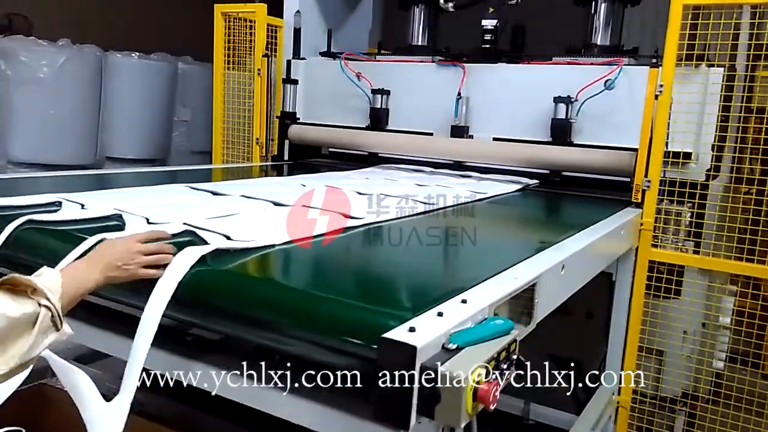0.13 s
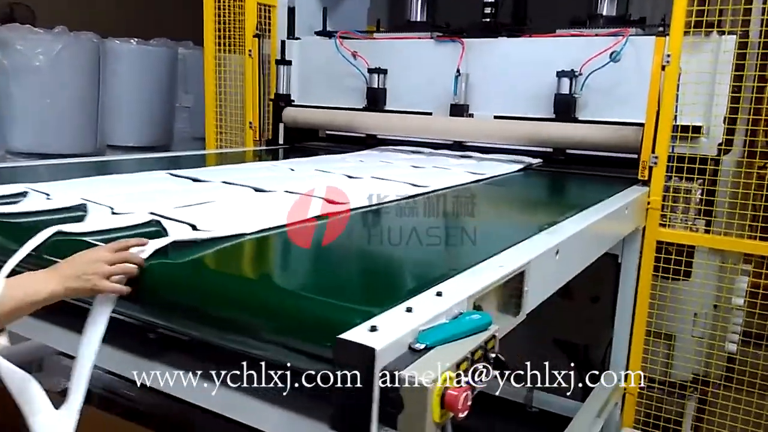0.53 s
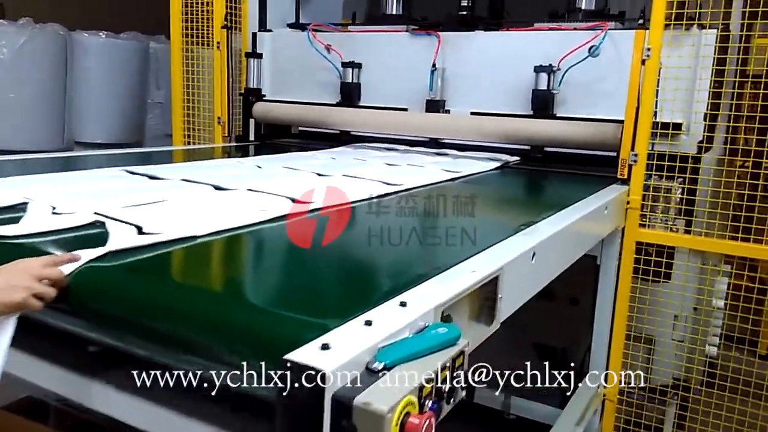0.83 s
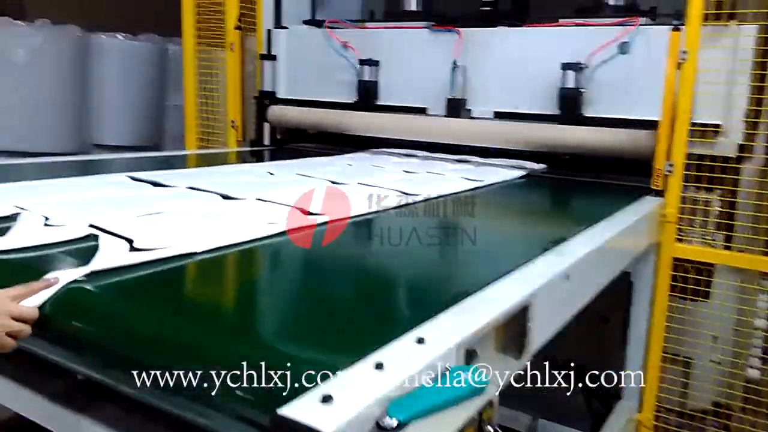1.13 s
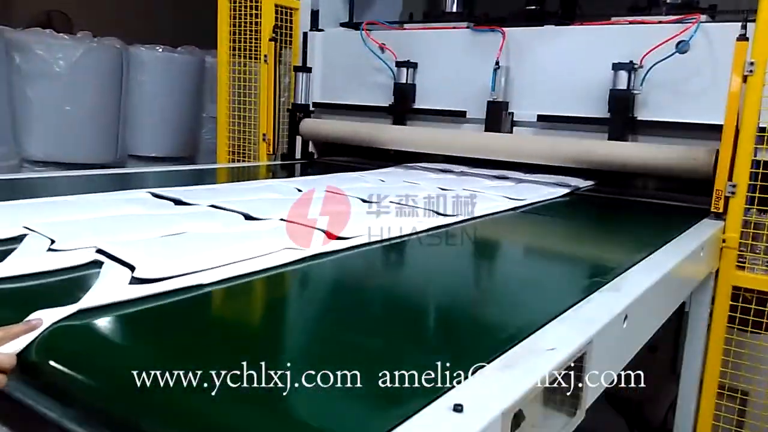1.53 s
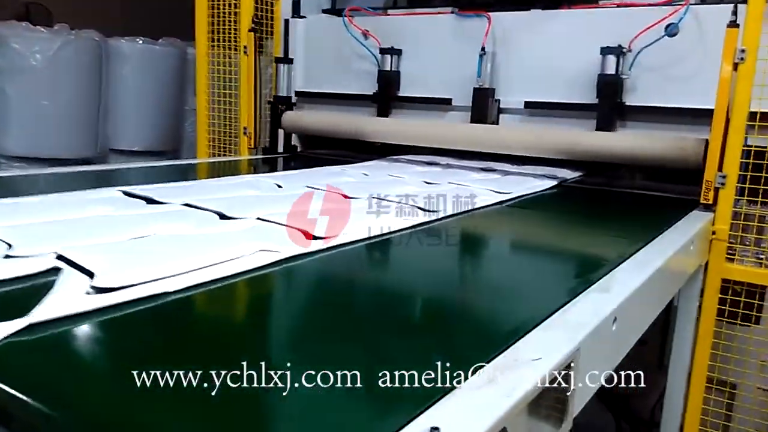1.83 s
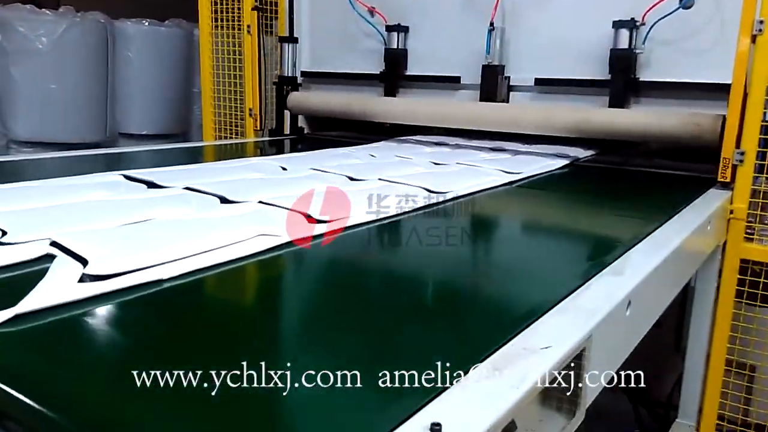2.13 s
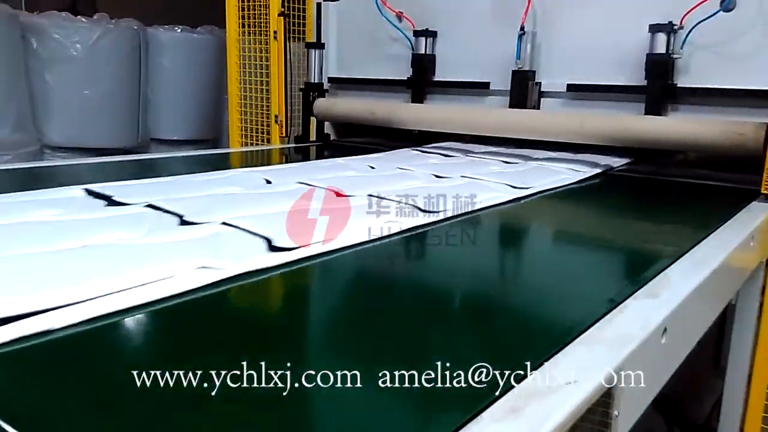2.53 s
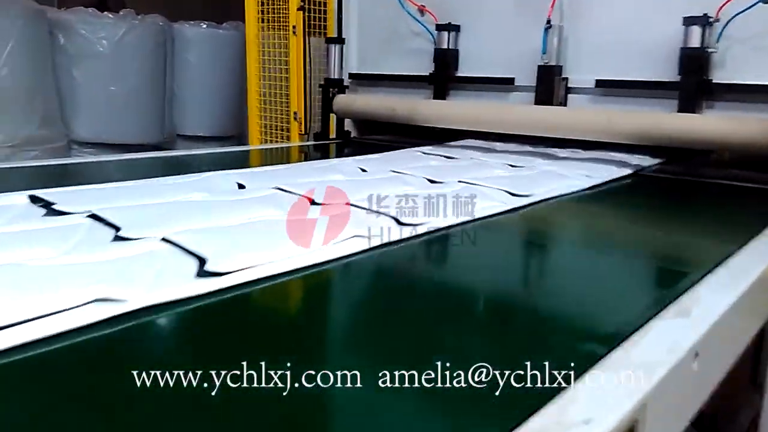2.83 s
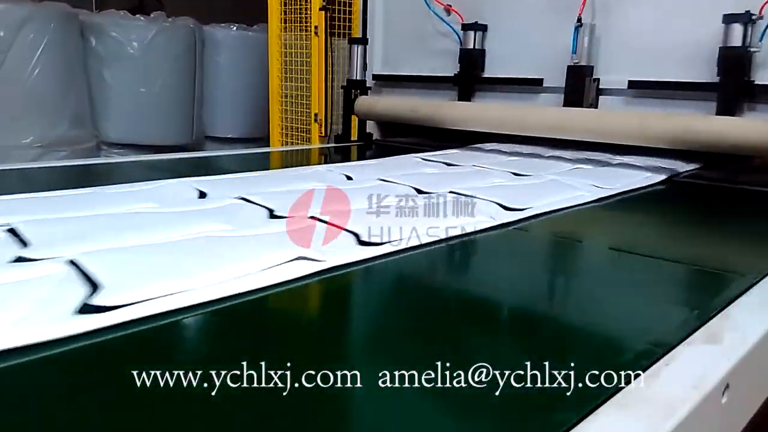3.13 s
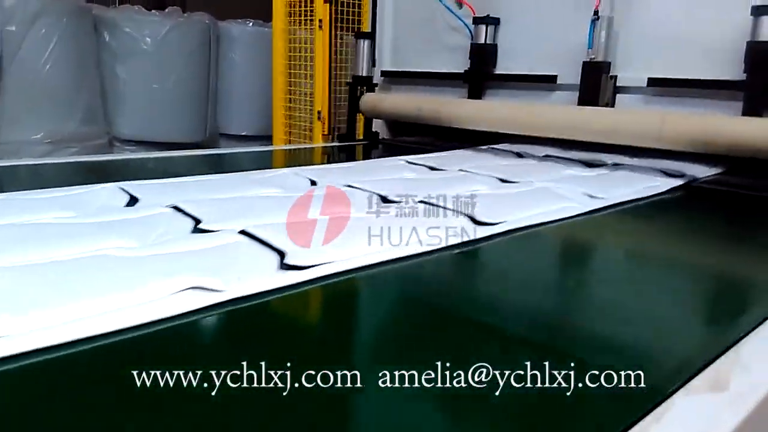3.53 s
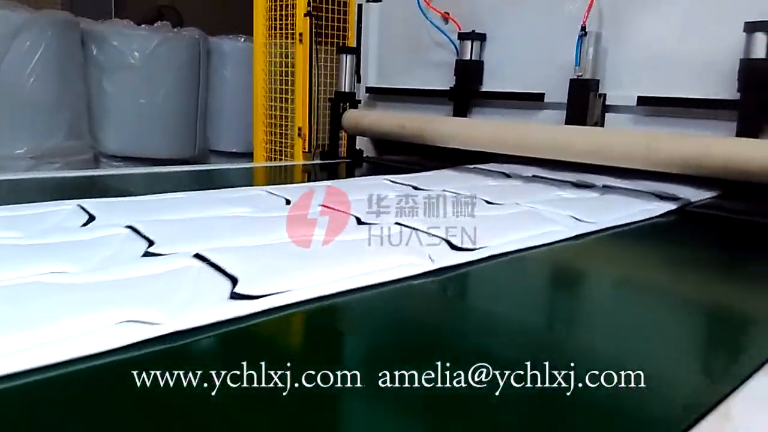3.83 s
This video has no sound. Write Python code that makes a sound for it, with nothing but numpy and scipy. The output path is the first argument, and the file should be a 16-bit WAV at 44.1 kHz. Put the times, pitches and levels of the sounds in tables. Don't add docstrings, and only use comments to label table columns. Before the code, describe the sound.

A hydraulic press hums, its pump straining loudly until 0.4 s, with an air puff and jolt at 0.3, then eases. Around 1.0-1.15 s the platen lands in hard metallic thuds and the pump labours again. At 1.7-1.8 s it releases with clunks and sharp air blasts. Dense foam-sheet crackling and rubbing follow at left until 2.9, with a piercing, fluctuating whine from 2.3 to 3.55 over steady idle hum and hall rumble.

```python
import sys
import numpy as np
from scipy import signal
from scipy.io import wavfile

SR = 44100
rng = np.random.default_rng(int(sys.argv[2]) if len(sys.argv) > 2 else 0)


def wav_out(sig):
    wavfile.write(sys.argv[1], SR, np.round(np.clip(np.atleast_2d(sig).T, -1, 1) * 32767).astype(np.int16))


def invert_db(level):
    return 10 ** (np.asarray(level, dtype=float) / 20)


N = 176400
T = np.arange(N) / SR

# t/s, level/dB, left-right/dB, tilt/(dB per octave)
HISS = [(0, -65.5, 4, -1), (.5, -70.5, 3, -3), (.88, -92, 7, 9), (.94, -70, 4, 2.5), (1.2, -73.5, 6, -2),
        (1.47, -102, 9, -12), (1.5, -81.5, 13, 4), (1.8, -71.5, 0, -10.5), (1.95, -61.5, 14, 5.5),
        (2.15, -69.5, 8, -3.5), (2.2, -58.5, 9.5, -3), (2.85, -53.5, 18.5, 0), (2.97, -62.5, 11, -3.5),
        (3.2, -75, 10, 7), (3.45, -72, 8, 2.5), (3.55, -66.5, 5.5, 7), (3.8, -69, 13, 2),
        (4, -66, 16, 10.5)]
# t/s, peak/dB, tilt/(dB per octave)
CRACKS = [(1.728, -19, 6), (1.7651, -8, 3.5), (1.8215, -9, -6), (1.8272, -1.5, 3), (1.8755, -8, 3),
          (1.8956, -2.5, 2), (1.9113, -15, 3), (1.9226, -4.5, 1), (1.9554, -11, 7), (1.9625, -15, 3.5),
          (1.9673, -15, 6), (1.981, -12, 9), (1.983, -13, 4), (1.9968, -7, 2.5), (2.0127, -6.5, 6),
          (2.037, -18, 2), (2.1562, -13, 14), (2.168, -11, 10), (2.1731, -15, 1), (2.1808, -10.5, 14),
          (2.191, -5.5, -1.5), (2.2009, -14, 7), (2.234, -6.5, -2.5), (2.249, -6, 8), (2.2717, -2.5, -4),
          (2.2974, 1, -3), (2.3157, -1.5, -2), (2.3425, -12, 8), (2.3456, -3, 4), (2.377, -5.5, 1),
          (2.4166, -4, 2.5), (2.4332, -24, -2), (2.4447, -27, -2), (2.4825, -24, 1), (2.486, -1, 0),
          (2.5181, 1, 4.5), (2.5352, -19, 4), (2.5422, -1, 3), (2.5465, -3, 2), (2.5586, -12, 4),
          (2.5707, -7, 8), (2.5853, -1, 3), (2.598, -3, 5), (2.602, -9, -6), (2.618, -6, 8),
          (2.6364, -3, -1), (2.658, -11, 6), (2.6717, 0, 2), (2.6916, -6.5, 1), (2.6985, -8, -6),
          (2.7164, -8, -2), (2.778, -15, -5), (2.7817, -9, 5), (2.8046, -4, -4.5), (2.832, -14, -3.5),
          (2.842, -9, -6), (2.8513, -11, -6.5), (3.8511, -14, 13)]


def in_time(rows):
    s, *columns = np.transpose(rows)
    return [np.interp(T, s, column) for column in columns]


def at_hz(points, hz):
    table_hz, values = np.transpose(points)
    return np.interp(np.log(hz), np.log(table_hz), values)


def drift(rate):
    r = np.exp(-80 * np.pi * rate / SR)
    chance = rng.standard_normal(N // 40 + 2002)
    slow = signal.lfilter([1], [1, -2 * r, r * r], chance)[2000:]
    return np.interp(np.arange(N) / 40, np.arange(len(slow)), slow / slow.std())


def pan(db):
    return np.array([np.ones_like(db), invert_db(-db)]).reshape(2, -1)


def burst(s, rise, t60):
    t = np.maximum(T - s, 0)
    return (1 - np.exp(-t / rise)) ** 2 * 10 ** (-6 * t / t60)


def snaps(powers):
    crack_s = 0.00081
    snap = np.arange(900) / SR / crack_s
    shape = (snap * np.exp(1 - snap)) ** 2
    out = np.zeros(N)
    for (s, _, _), power in zip(CRACKS, powers):
        i = int((s - crack_s) * SR)
        out[i:i + len(snap)] += power * shape
    return out


def pump():
    # t/s, load (0 idle, 1 press, 2 lift)
    pump_load = [
        (0, 1.91),
        (.3, 2.2),
        (.46, 0.22),
        (.86, 0.017),
        (1.0, 1.1),
        (1.67, 0.9),
        (1.74, 0),
        (4, 0.058),
    ]
    multiples = [12, 13, 26, 35, 36, 38, 39, 40, 48, 51, 52, 53, 59, 64, 65, 66, 68, 69, 70, 78, 79, 84,
                 104, 108, 116, 117, 131, 156]
    # idle/dB, pressing/dB, lifting/dB, left-right/dB
    order_levels = [(-37, -34, -40, 1.5), (-35, -33.5, -55, 3), (-35, -43, -33.5, 7), (-48, -52, -45, 4),
                    (-43.5, -63, -44, 16), (-69, -59, -33.5, -2), (-45.5, -35, -30, 2.5),
                    (-59, -74, -27.5, 5), (-75, -40.5, -39, 12), (-53, -51, -47, 10), (-70, -60, -41, 10),
                    (-44.5, -45, -48, 14), (-50, -53, -51, 10), (-55, -46, -29.5, 0), (-40, -37, -31, 11.5),
                    (-53.5, -49, -34, 1), (-49.5, -31.5, -35, 22), (-78, -40.5, -38, 13),
                    (-72, -51, -46, 8), (-50.5, -63, -50, 14), (-57, -70, -45, 4), (-51.5, -63, -57, 10),
                    (-57, -52.5, -47.5, 0), (-52.5, -64, -49, 6), (-78, -62, -45, -2), (-64, -52, -43.5, 3),
                    (-60, -47.5, -48, 14), (-73, -67, -45, 13)]
    # multiple, t/s, half width/s, level/dB
    field = [(13, .65, .35, -8), (13, 2.7, .3, 3), (26, .65, .35, -3), (26, 3.25, .35, -5),
             (35, 3.6, .3, 8), (36, 3.6, .35, 11), (65, 3.6, .5, -8), (78, 3.08, .34, 12), (84, 3.9, .2, 8)]
    idle_turns_per_s, port_lag_s = 24.84, 0.00022
    wobble_db, wobble_hz, waver_rad = 2.0, 4.5, 0.3
    knock_order, knock_spread = 39.5, 0.078

    load = np.clip(in_time(pump_load)[0], 0, 2)
    speed = idle_turns_per_s - np.interp(load, [0, 1, 2], [0, .22, .38])
    turn = 2 * np.pi * np.cumsum(speed) / SR
    out = 0
    for k, (idle, press, lift, pan_db) in zip(multiples, order_levels):
        wobble = drift(wobble_hz)
        level = np.interp(load, [0, 1, 2], [idle, press, lift]) + wobble_db * wobble
        for multiple, s, wide, db in field:
            if multiple == k:
                level += db * np.exp(-((T - s) / wide) ** 2)
        phase = k * turn - knock_spread * (k - knock_order) ** 2 + waver_rad * wobble[::-1]
        late = phase + np.pi - 2 * np.pi * k * speed * port_lag_s
        out = out + np.sqrt(2) * invert_db(level) * pan(pan_db) * np.sin([phase, late])
    return out


def noises():
    # f/Hz, correlation
    likeness = [(60, -1.02), (180, -0.89), (540, -0.9), (1640, 0.06), (4940, -0.13), (14900, 0.078)]
    # f/Hz, level/dB
    mic = [(3000, -0.5), (6800, -2), (8400, 7), (10800, -12.5), (13600, -13.5)]
    edges = 35 * 2 ** (np.arange(27.5) / 3)
    white = rng.standard_normal((2, 2, N))
    grain = drift(45)
    out = 0
    for k, (low, high) in enumerate(zip(edges, edges[1:])):
        hz = np.sqrt(low * high)
        power = hall(hz)
        if hz > 600:
            sheet = sheet_colour(hz)
            power = power + hiss(hz, sheet, grain) + blasts(hz, sheet) + crackles(hz, sheet)
            power = power * passing_resonances(hz)
        power = power + blows(hz)
        band = signal.butter(2, [low, high], "band", fs=SR, output="sos")
        mid, side = signal.sosfilt(band, white[k % 2])
        alike = np.clip(at_hz(likeness, hz), -.99, .99)
        stereo = np.sqrt(1 + alike) * mid + np.sqrt(1 - alike) * side * [[1], [-1]]
        out = out + np.sqrt(power * SR / 4) * invert_db(at_hz(mic, hz)) * stereo
    return out


def hall(hz):
    # f/Hz, level/(dB per Hz)
    hall_level = [(40, -55), (150, -70.5), (300, -62), (700, -66), (1600, -68.5), (3200, -77),
                  (6000, -76.5), (14000, -95.5)]
    # f/Hz, left-right/dB
    hall_pan = [(60, 2), (240, 2.5), (940, 4.5), (3750, 2.5), (14900, 7.5)]
    patch_db = 2
    return invert_db(2 * (at_hz(hall_level, hz) + patch_db * drift(20.0))) * pan(at_hz(hall_pan, hz)) ** 2


def sheet_colour(hz):
    # f/Hz, level/(dB per Hz)
    sheet_level = [(800, -14.5), (1500, -16), (2600, -3.5), (3200, -9), (5500, 1), (7000, -1), (9000, 0),
                   (14000, -2)]
    return at_hz(sheet_level, hz)


def hiss(hz, sheet, grain):
    level, pan_db, tilt = in_time(HISS)
    grain_db = 1
    colour = sheet + tilt * np.log2(hz / 6000) + grain_db * (grain + drift(22))
    return invert_db(2 * level) * pan(pan_db) ** 2 * invert_db(2 * colour)


def blasts(hz, sheet):
    # t/s, level/dB, left-right/dB, t60/s, tilt/(dB per octave)
    valve_blasts = [
        (0.3, -49.5, -0.5, 0.083, -0.5),
        (.302, -55, 6, 0.52, 1),
        (1.0143, -47, -0.5, 0.03, -5.5),
        (1.705, -67, 2, .5, 8),
        (1.713, -58, 3.5, 0.9, 0),
        (1.796, -42.5, 1.5, 0.05, 0),
        (1.799, -53.5, 5.5, 0.68, -3),
    ]
    rise_s = 0.0012
    _, db, pan_db, _, tilt = np.transpose(valve_blasts)
    envelopes = np.array([burst(s, rise_s, t60) for s, _, _, t60, _ in valve_blasts])
    level = invert_db(2 * (db + .5 * sheet + tilt * np.log2(hz / 6000)))
    return (level * pan(pan_db) ** 2) @ envelopes


def blows(hz):
    # t/s, level/dB, t60/s, tilt/(dB per octave)
    frame_blows = [
        (.305, -54.5, 1.02, 3),
        (0.919, -63, 3.9, 4.5),
        (0.992, -44.5, 0.28, -0.5),
        (1.017, -40.5, 0.49, -1),
        (1.064, -48.5, 0.68, 2),
        (1.081, -35.5, 0.12, 1.5),
        (1.15, -48.5, 0.44, -3),
        (1.8, -46.5, 0.59, -0.5),
    ]
    # f/Hz, level/(dB per Hz)
    frame = [(60, -9.5), (150, -4), (260, 1.5), (500, -1), (1000, -3.5), (1650, -4.5), (2500, -15),
             (6000, -31.5)]
    rise_s, pan_db = 0.0039, 3
    _, db, _, tilt = np.transpose(frame_blows)
    envelopes = np.array([burst(s, rise_s, t60) for s, _, t60, _ in frame_blows])
    level = invert_db(2 * (db + at_hz(frame, hz) + tilt * np.log2(hz / 500)))
    return level @ envelopes * pan(pan_db) ** 2


def thumps():
    # t/s, level/dB, f/Hz, t60/s
    ram_stops = [(0.994, -6, 250, 0.11), (1.014, -3.5, 250.4, 0.39), (1.085, -4.5, 978, 0.13),
                 (1.086, -12, 1660, 0.088), (1.707, -2, 114.3, 0.27), (1.722, -13, 111, 0.48),
                 (1.724, -2, 183, 0.19), (1.801, -22, 105.5, 1), (.309, -24, 2750, 0.055),
                 (.998, -22, 3980, .04), (1.72, -16.5, 398, 0.39), (1.735, -11, 1090, 0.24)]
    out = np.zeros(N)
    for s, db, hz, t60 in ram_stops:
        tone = np.sin(2 * np.pi * hz * (T - s) + 0.99 * drift(24.0))
        out += invert_db(db) * np.sqrt(burst(s, 1 / hz, t60)) * tone
    return out * [[1], [-1]] * pan(2.5)


def crackles(hz, sheet):
    level_db, colour_db, pan_db = -44.5, 3, 19.5
    colour = colour_db * rng.standard_normal(len(CRACKS))
    _, db, tilt = np.transpose(CRACKS)
    powers = invert_db(2 * (db + level_db + sheet + tilt * np.log2(hz / 6000) + colour))
    return snaps(powers) * pan(pan_db) ** 2


def passing_resonances(hz):
    # t/s, half length/s, f/Hz, level/dB
    formants = [
        (1.755, .04, 5660, 11.5),
        (1.848, 0.043, 3630, 5),
        (2.796, 0.1, 5800, 9),
        (2.5, 0.87, 29000, 12),
    ]
    width_octaves = 0.18
    gain = 1
    for s, half, formant_hz, db in formants:
        near = np.log2(hz / formant_hz) / width_octaves
        if abs(near) < 2:
            gain = gain * invert_db(2 * db * np.exp(-near ** 2 - ((T - s) / half) ** 4))
    return gain


def sheet_ring():
    ring_hz, wide_hz, ring_db, crack_db = 1856, 327, 25.5, -18
    lifted_s, from_s, to_s = 2, 2.47, 2.98
    hiss_db, hiss_pan, _ = in_time(HISS)
    pulled = np.interp(T, [from_s, from_s + 0.034, to_s - .2, to_s], [0, 1, 1, 0])
    rub = pulled * invert_db(hiss_db + ring_db + 1.6 * drift(30.3))
    knocks = snaps([invert_db(2 * (db + crack_db)) * (lifted_s < s < to_s) for s, db, _ in CRACKS])
    drive = np.sqrt(knocks + rub ** 2) * np.sqrt(SR / wide_hz)
    noise = drive * rng.standard_normal((2, N)) + 1e-18
    b, a = signal.iirpeak(ring_hz, ring_hz / wide_hz, SR)
    return signal.lfilter(b, a, signal.lfilter(b, a, noise)) * pan(hiss_pan)


def whine():
    # t/s, level/dB, left-right/dB
    whine_level = [(2.285, -59, 25), (2.305, -22.5, 20), (2.48, -18, 25), (2.56, -45, 20), (2.7, -21, 20),
                   (2.76, -23, 20), (2.85, -22, 15), (2.96, -16, 18), (3.07, -29, 9), (3.2, -16, 16),
                   (3.28, -25.5, 2), (3.34, -19, 11), (3.4, -46, -11.5), (3.5, -21, 9), (3.55, -31, 9),
                   (3.565, -70, 18)]
    hz, right_phase_rad = 8004, 1.5
    db, pan_db = in_time([(0, -120, 0)] + whine_level + [(4, -120, 0)])
    tone = np.sin(2 * np.pi * hz * T + np.array([[0], [right_phase_rad]]))
    return np.sqrt(2) * invert_db(db) * pan(pan_db) * tone


def scene():
    return pump() + noises() + thumps() + sheet_ring() + whine()


def band_limit(x):
    return signal.sosfilt(signal.butter(12, 15470, fs=SR, output="sos"), x)


def record(dry):
    port_hz, port_q, port_gain = 13600, 7.6, 0.63
    b, a = signal.iirpeak(port_hz, port_q, SR)
    dry = dry + port_gain * signal.lfilter(b, a, dry)
    top_cut = signal.cheby2(12, 45, 14850, fs=SR, output="sos")
    mix = np.clip(signal.sosfilt(top_cut, dry), -1, 1)
    return band_limit(mix)


dry = scene()
out = record(dry)
wav_out(out)
```